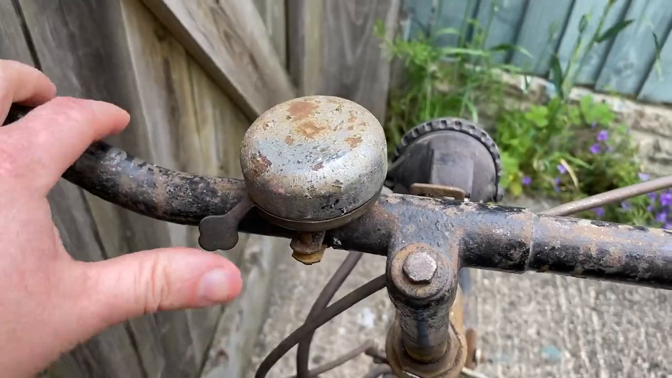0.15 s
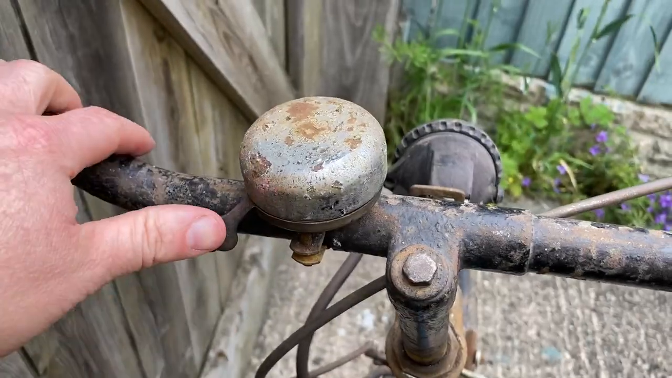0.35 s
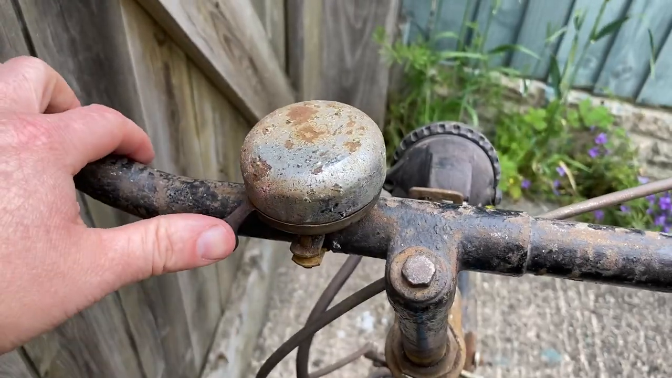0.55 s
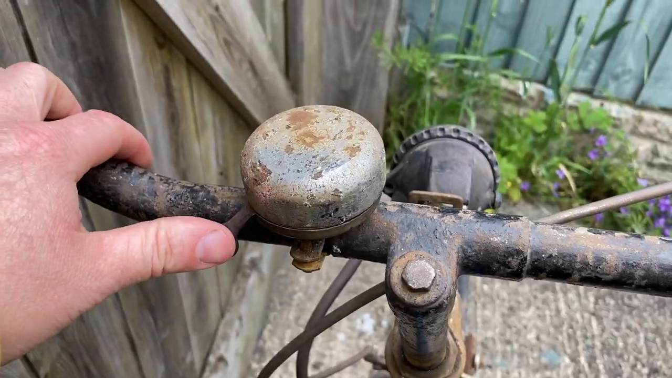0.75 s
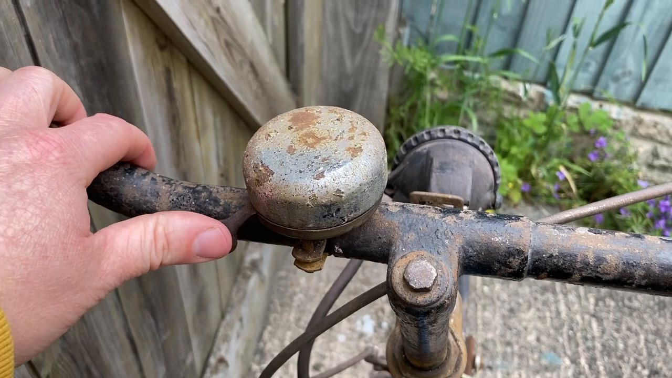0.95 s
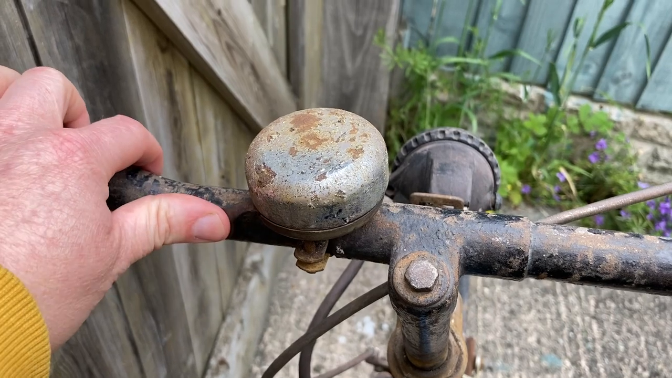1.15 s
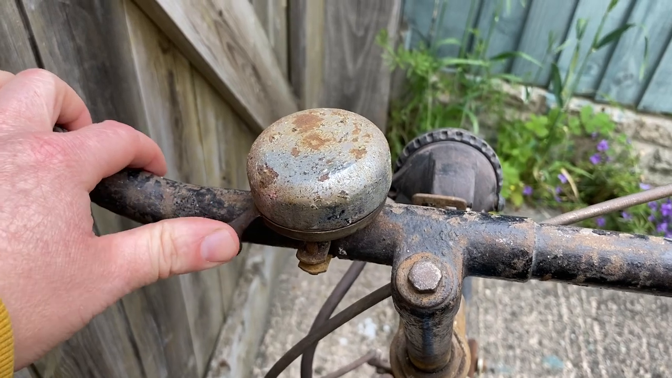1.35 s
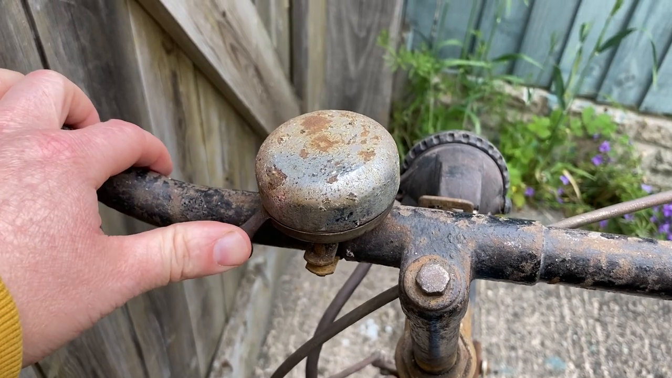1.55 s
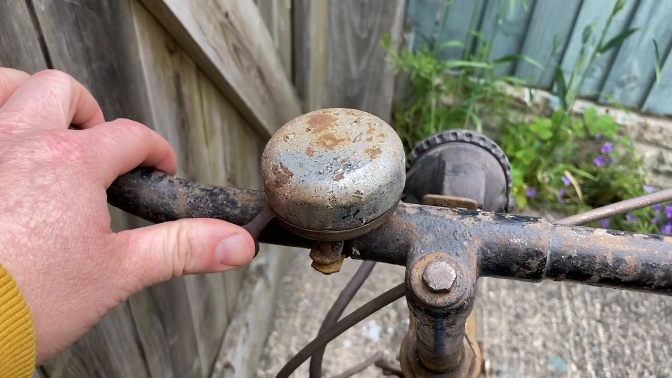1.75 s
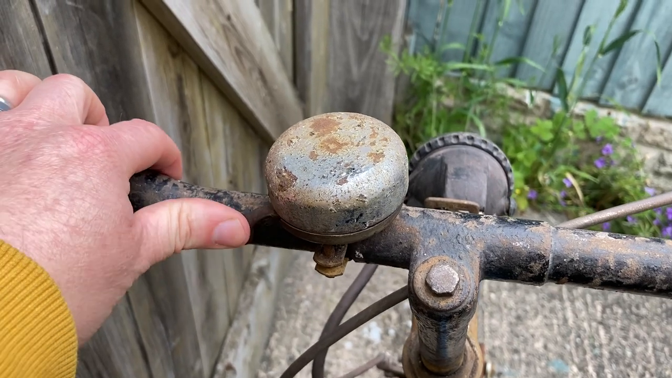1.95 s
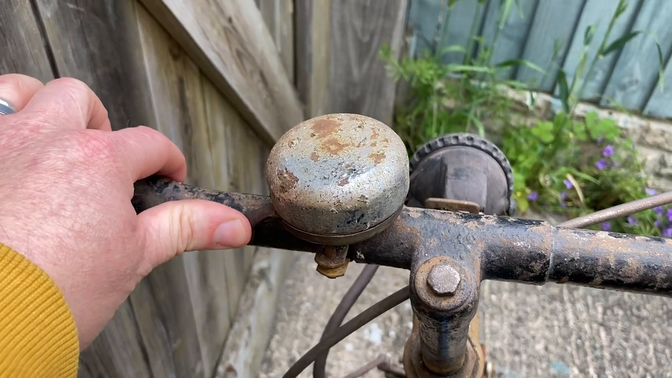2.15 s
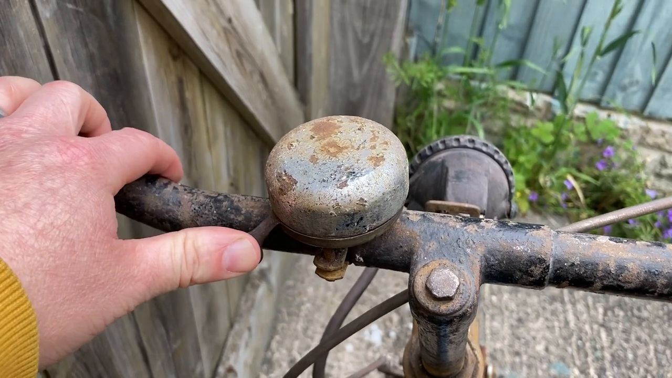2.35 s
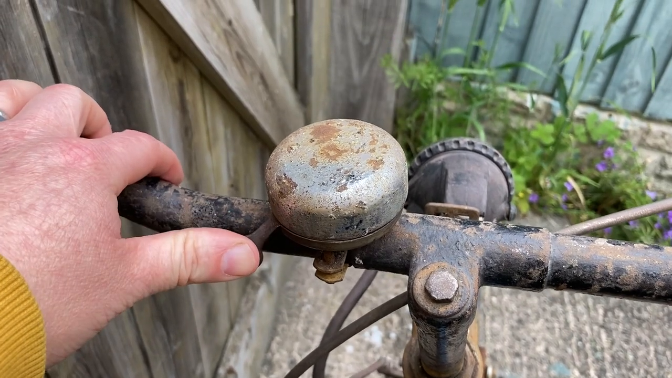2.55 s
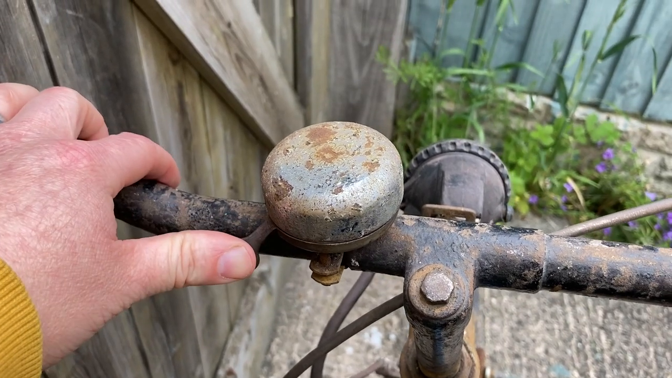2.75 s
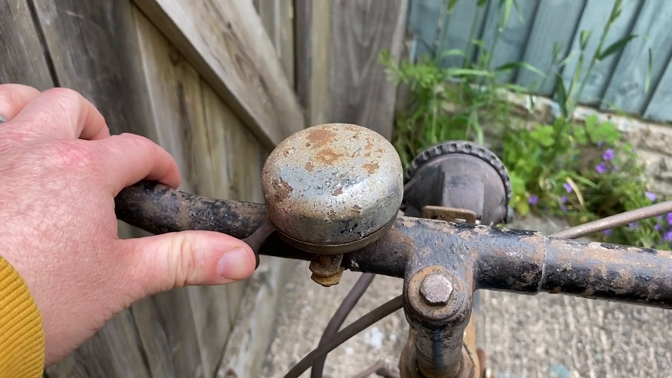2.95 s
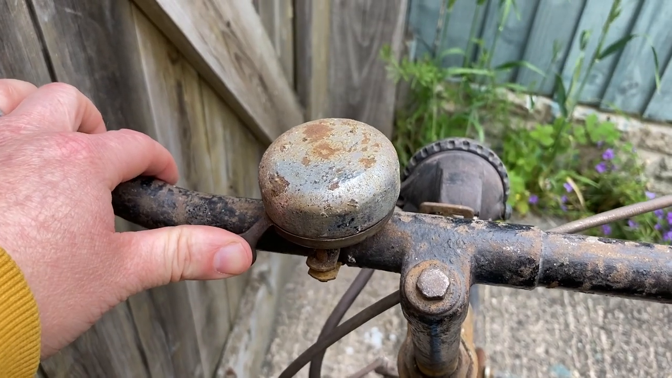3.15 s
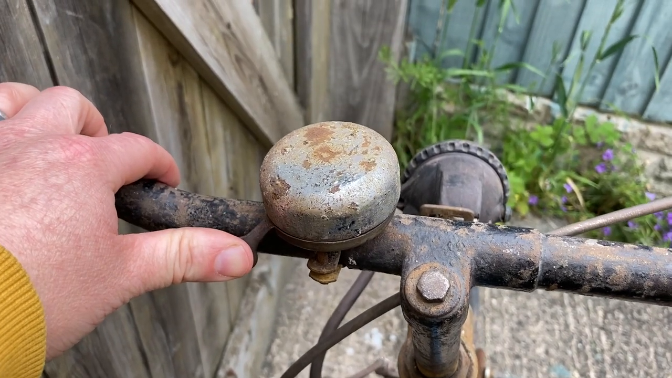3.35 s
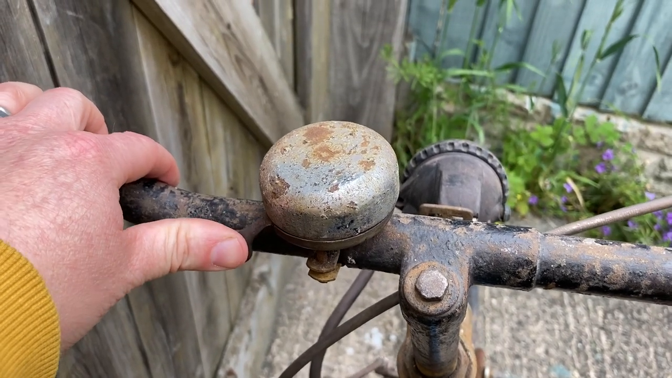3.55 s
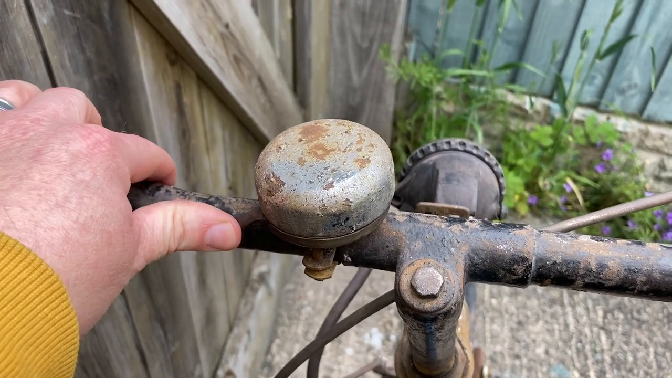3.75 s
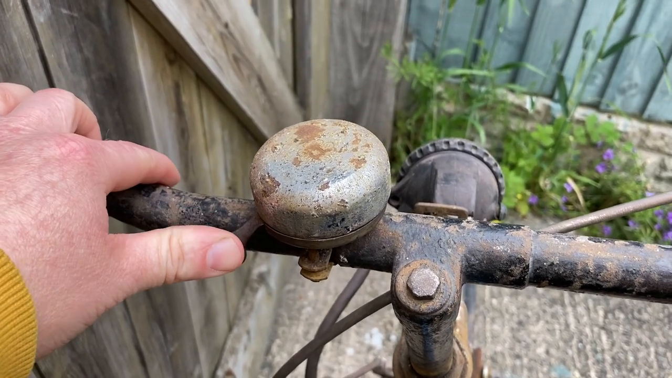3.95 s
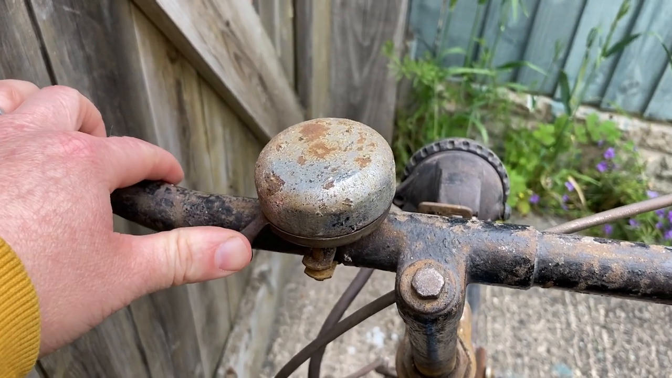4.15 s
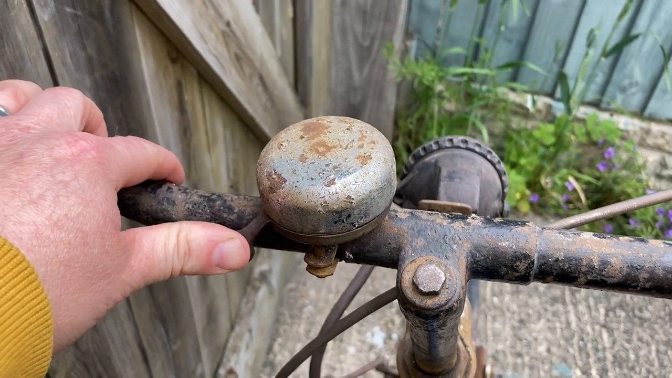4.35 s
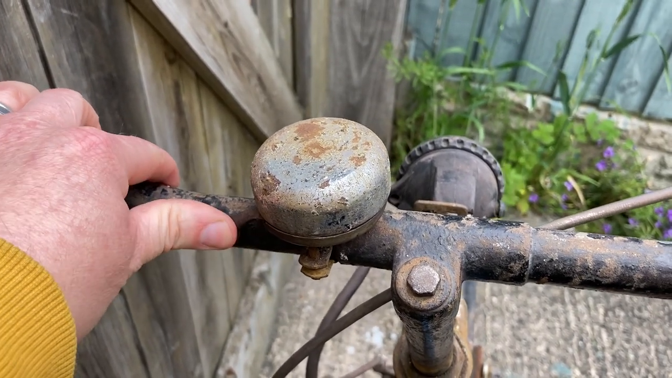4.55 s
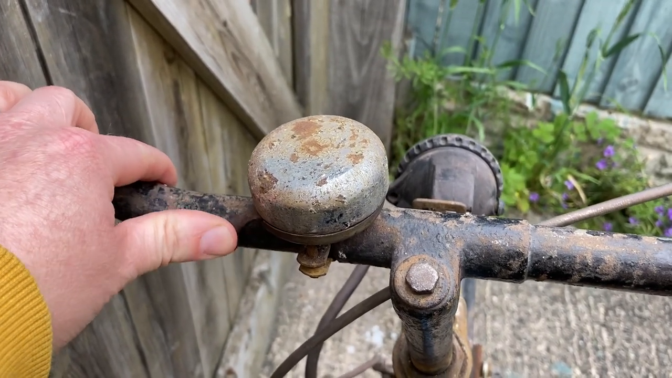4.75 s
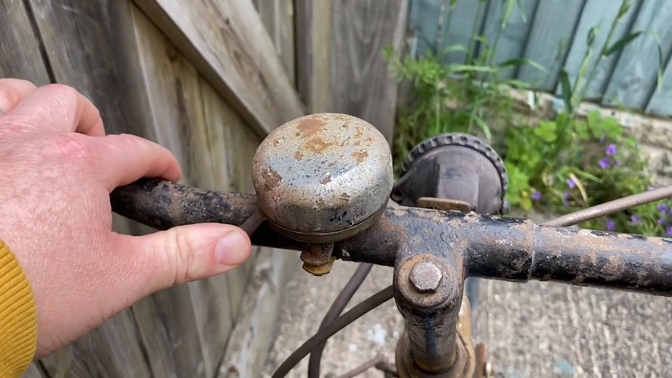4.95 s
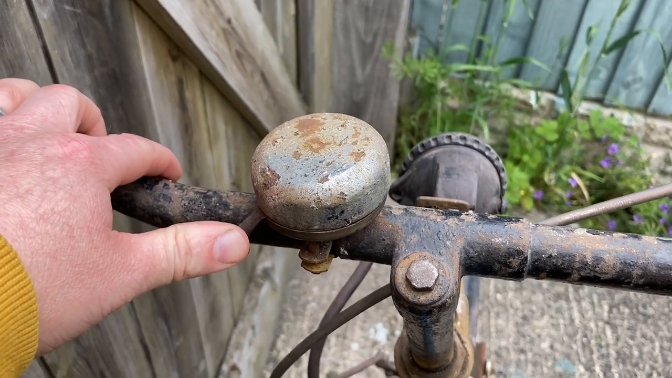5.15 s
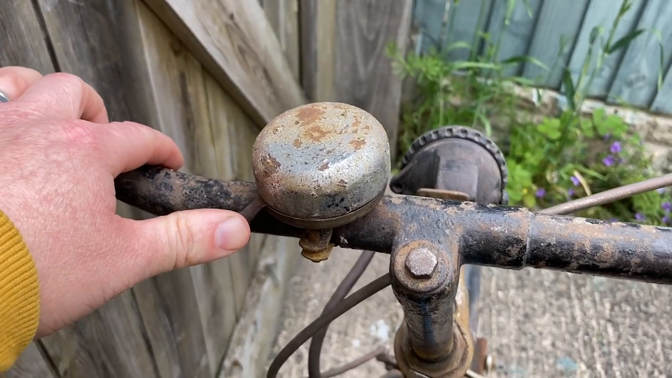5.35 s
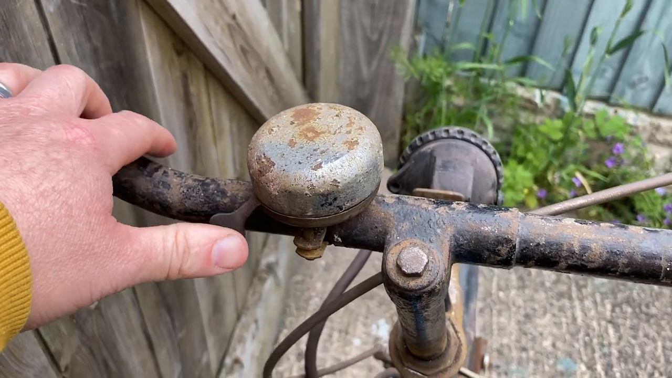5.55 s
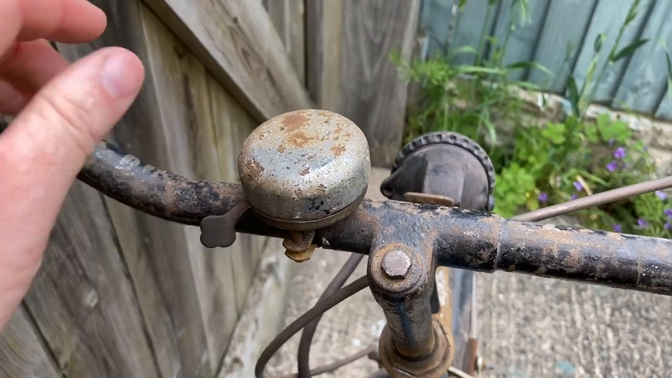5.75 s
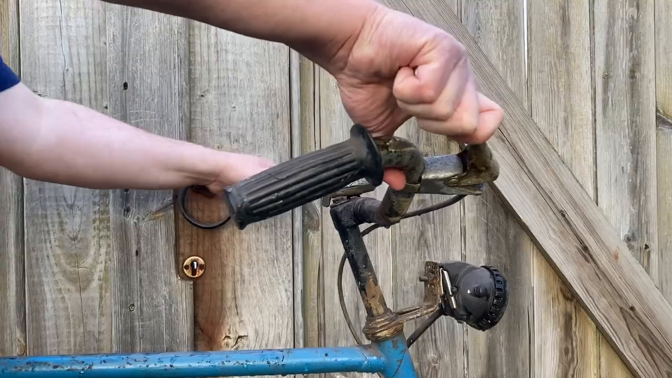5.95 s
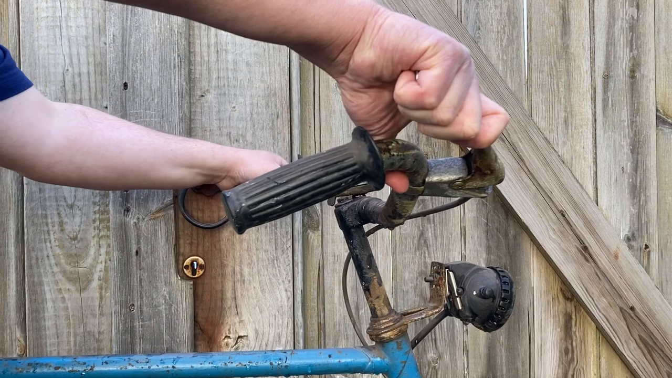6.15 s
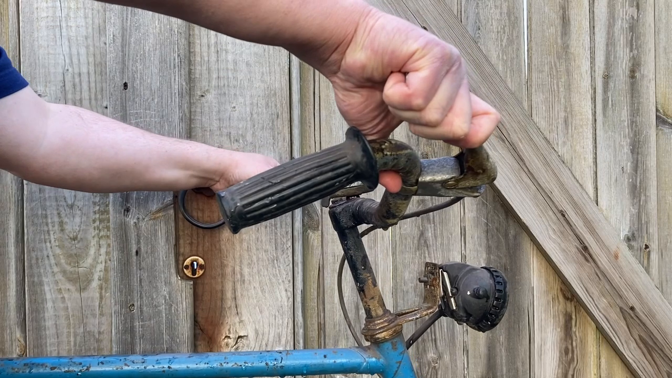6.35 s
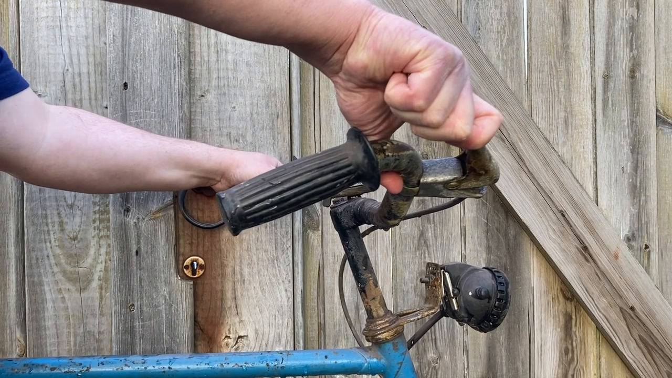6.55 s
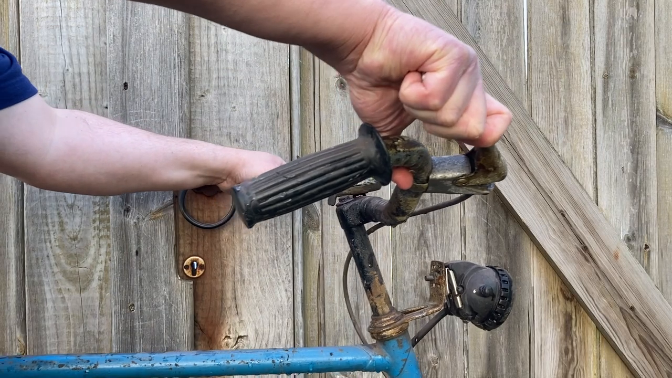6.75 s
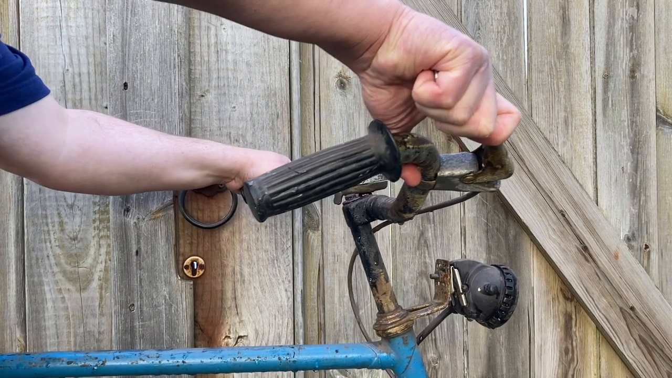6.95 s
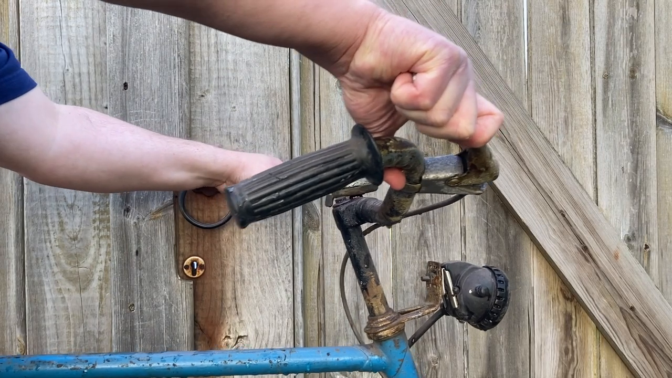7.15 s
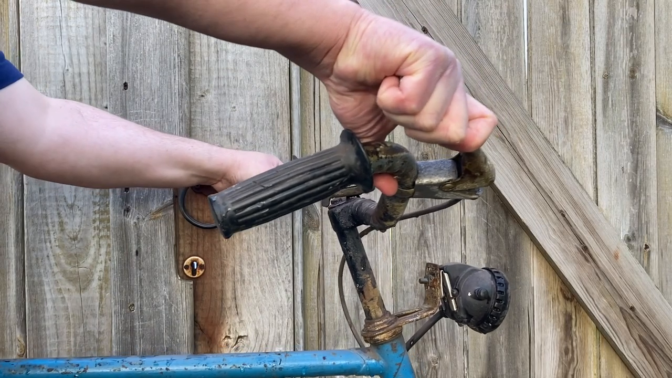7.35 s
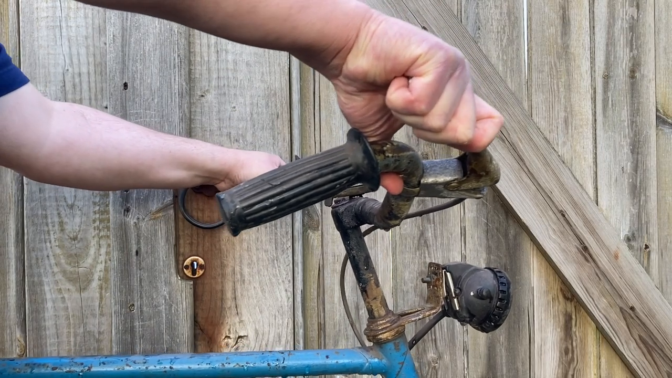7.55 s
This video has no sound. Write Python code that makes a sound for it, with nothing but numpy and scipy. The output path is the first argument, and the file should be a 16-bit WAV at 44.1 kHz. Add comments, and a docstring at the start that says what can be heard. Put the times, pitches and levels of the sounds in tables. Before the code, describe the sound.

Four grinding, jangling double rings of an old bike bell in a garden with faint bird chirps, then rougher traffic noise and handling clicks.

```python
"""An old bicycle bell, close to a two-port microphone in a garden: a thumb pushes the lever and lets it return,
gears tick and whirr, and spinning washers strike a dome built from decaying pairs of twin modes.
Noise bursts ring the gear plate and handlebar; fence and wall answer with a short diffuse echo.
Around them: coloured noise for far traffic, wind, low thuds and a rustling hand; trilled glides for far birds.
After a cut the microphone stands in a second place: louder traffic and small clicks of the handled bicycle."""
import sys
import numpy as np
from scipy import signal
from scipy.fft import rfft, irfft, next_fast_len
from scipy.io import wavfile
from scipy.ndimage import uniform_filter1d, map_coordinates

SR = 44100
rng = np.random.default_rng(int(sys.argv[2]) if len(sys.argv) > 2 else 0)


def output_pcm(signal):
    """Save a mono or channel-first signal as 16-bit PCM at the path in sys.argv[1].

    Samples are clipped to [-1, 1] before scaling.
    """
    pcm = np.clip(np.atleast_2d(signal).T, -1, 1) * 32767
    wavfile.write(sys.argv[1], SR, np.round(pcm).astype(np.int16))


N = 335160  # samples
CUT_S = 5.865  # cut to the second place
TOP_HZ = 17100  # band limit

# Levels in the tables are relative: spectra are normalised, and layers add their own offsets and random swells.
# Traffic level over time: time_s, level_db
TRAFFIC = [(0, -73.5), (.9, -72), (2.6, -69), (3.2, -72.5), (5.2, -68.5), (5.84, -71.5), (5.862, -88),
           (5.89, -58.5), (6.7, -58), (7.6, -58.5)]
# Colour of the traffic at the first and at the second place: frequency_hz, density_db_per_hz
FIRST_ROAD = [(90, -29.5), (150, -10.5), (300, -16), (450, -17), (650, -19), (900, -10), (1100, -14.5),
              (1600, -17), (2200, -28), (3000, -35.5), (4500, -45), (6500, -47), (17000, -55.5)]
SECOND_ROAD = [(88, -31), (150, -9), (420, -2.5), (532, -7), (760, 1.5), (1130, -1), (4090, -31),
               (7550, -45.5), (9200, -64), (9960, -38), (11700, -42), (13700, -52), (15400, -50),
               (17000, -58)]
# Likeness of the traffic at the two ports: frequency_hz, likeness (1 = identical)
ALIKE = [(60, 0.96), (180, 0.45), (550, -0.11), (1650, -0.023), (4970, 0.44), (15000, -0.17)]
# Low rumble of the wind: time_s, level_db, upper_part_db (relative to the rumble)
WIND = [(0, -65, -12.5), (.9, -67, -9.5), (1.8, -64.5, -7), (2.75, -66, -10), (2.95, -59, -16),
        (3.42, -67.5, -8.5), (3.55, -59, -12.5), (4.1, -57, -4), (4.3, -58.5, -12.5), (4.6, -65, -5.5),
        (4.8, -50.5, -6), (5.05, -62.5, -16.5), (5.3, -66, -8), (5.85, -69, -18), (5.95, -57.5, -12),
        (6.3, -60.5, -7), (6.7, -57, -10.5), (7.6, -57.5, -7.5)]
# Low thuds of wind gusts and of the lever through the handlebar:
# centre_s, length_s, level_db, upper_part_db (relative to the thud)
LOW_THUDS = [(0.735, 0.063, -59.5, -21), (1.396, 0.063, -53.5, 0.5), (1.95, 0.053, -57, 2.5),
             (2.353, 0.086, -54.5, -4.5), (3.104, 0.036, -47, -15.5), (3.322, 0.047, -42.5, -8),
             (3.637, 0.073, -62.5, 7), (4.187, 0.053, -49.5, -10), (4.447, 0.072, -43, -12.5),
             (4.723, 0.064, -43, -7.5), (4.817, 0.043, -48, 8.5), (4.914, 0.045, -43, -4.5),
             (4.974, 0.057, -49, -21), (5.132, 0.049, -51.5, -7.5)]
# Colours of the low and upper parts of rumble and thuds: frequency_hz, density_db_per_hz
LOW_PART = [(10, -120), (20, -31.5), (35, -10.5), (50, 2.5), (68, 3), (95, -3.5), (130, -11.5),
            (180, -50.5), (400, -120)]
UPPER_PART = [(40, -120), (90, -42.5), (135, 4), (220, -4.5), (330, -12), (600, -30.5), (900, -57.5),
              (2000, -120)]
LUMPS_DB = 2.5  # depth of the random swells of the rumble

# Handling clicks: time_s, treble_db, body_db, left_over_right_db
CLICKS = [(0.2827, -79, -61, 9), (0.4434, -77, -79, 8), (0.574, -73, -70, 2), (5.9213, -52.5, -73, 0),
          (5.9801, -54.5, -64, 3), (5.9878, -75, -65, -3), (5.9982, -61, -61, 8), (6.0452, -62.5, -78, 3),
          (6.0672, -53.5, -80, -4), (6.194, -66.5, -74, 5), (6.5841, -66, -61.5, 3), (6.726, -64, -73.5, 5),
          (6.8024, -74.5, -54, 5), (6.8577, -62, -72, 0.0), (6.9178, -74.5, -53.5, 4), (6.922, -66, -73, 5),
          (7.083, -56, -75, 2), (7.1427, -73, -72, -2), (7.2346, -52, -39.5, 5), (7.2372, -41, -62, -1),
          (7.239, -53, -49, 6), (7.244, -48, -45.5, 8.5), (7.401, -58.5, -61, 1.5),
          (7.5724, -58.5, -66.5, -1.5)]
# Colours of a click's bright and dull parts: frequency_hz, gain_db
BRIGHT_CLICK = [(3500, -88), (6000, -4), (7500, 3.5), (9300, -14), (12000, 2.5), (15800, -13), (16500, -54)]
DULL_CLICK = [(150, -80), (500, 0), (1600, -2), (4200, 4.0), (7000, -17.5), (10000, -55)]
# Skin and sleeve rubbing: start_s, length_s, level_db
RUBS = [(0.102, 0.043, -86), (0.226, 0.13, -87), (5.936, .09, -76.5), (6.044, 0.035, -83),
        (6.694, .05, -81.5), (7.085, 0.033, -83.5), (7.24, 0.023, -74)]
# Colour of the rubbing: frequency_hz, density_db_per_hz
RUB_COLOUR = [(2650, -26), (4500, -13), (8020, 6.5), (8970, -15), (9740, 1), (11400, 7.5), (13700, -12.5),
              (15000, 7.5), (17000, -39)]
RUB_EDGE_DB_PER_S = 304  # rise and fall of each rub
RUB_BED_DB = (-94.5, -88)  # faint rubbing between them, at the first and second place

# Far bird chirps: start_s, end_s, from_hz, to_hz (the glide crosses the 30 to 80 % part of this range), level_db
BIRDS = [(0.17, 0.339, 4310, 3500, -77.5), (0.726, 0.874, 4620, 3400, -86),
         (2.414, 2.59, 4900, 3600, -80.5), (3.015, 3.181, 4440, 3370, -82), (3.205, 3.443, 4900, 3280, -80),
         (3.414, 3.528, 4453, 2826, -74), (5.066, 5.227, 4620, 3250, -79.5),
         (5.246, 5.5, 5060, 2773, -77.5), (5.477, 5.625, 4690, 3250, -77),
         (5.627, 5.833, 5190, 3040, -75.5), (6.407, 6.56, 4490, 3210, -67), (6.729, 6.857, 4160, 3460, -78),
         (7.269, 7.303, 3530, 3120, -71), (7.45, 7.603, 4260, 3200, -68.5)]
# Echoes of fence and wall: frequency_hz, gain_db
FENCE_COLOUR = [(1500, -6.0), (3000, -9.5), (6000, -9), (11000, 0), (13500, -16)]

# Lever travel: first_tooth_s, drone_start_s, stop_s, drone_db, knock_db (at the stop)
STROKES = [(.931, .974, 1.111, -59, -58.5), (1.258, 1.287, 1.403, -61, -51), (1.823, 1.907, 2, -52.5, -48),
           (2.17, 2.209, 2.329, -56.5, -45), (3.515, 3.54, 3.697, -56, -62.5),
           (3.827, 3.859, 4.005, -56, -47.5), (4.362, 4.408, 4.533, -55.5, -62),
           (4.72, 4.743, 4.864, -57.5, -43)]
# Individually placed gear teeth: time_s, level_db
TEETH = [(1.046, -40), (1.09, -43), (1.108, -50), (1.4, -46), (1.407, -41), (1.847, -50), (1.885, -41),
         (1.922, -51.5), (1.981, -40.5), (2.265, -40.5), (2.33, -36), (3.629, -36), (3.662, -39),
         (3.827, -47.5), (3.89, -41.5), (3.971, -40), (3.996, -36), (4.383, -48.5), (4.41, -55),
         (4.415, -47.5), (4.473, -33.5), (4.785, -45.5), (4.804, -39), (4.832, -38.5), (4.858, -30.5)]
TOOTH_S, TOOTH_SCATTER = .011, .25  # spacing of a stroke's soft teeth, and scatter as a share of a gap
FIRST_DB, FULL_DB, TOOTH_SPREAD_DB = -60, -43, 2.5  # first tooth, teeth at full speed, random spread
LEAD_S, LEAD_DB = 0.0083, -45.5  # a tooth ticks just ahead of each later strike
# Dry edge of a tooth: frequency_hz, density_db_per_hz
TICK = [(700, -30), (1500, -12.5), (4000, -4), (7000, -5.5), (11000, -0.5), (16000, -8)]
# Resonances of the gear plate: centre_hz, width_hz, level_db
PLATE = [(2500, 500, -12.5), (5170, 170, -12.5), (8000, 690, -7.5), (8695, 170, -15.5), (10590, 150, 0),
         (11240, 450, 1.5), (12350, 360, -1.5), (12324, 570, -12.5), (14500, 150, -6.5),
         (15100, 270, -11.5), (15600, 190, -8)]
# Resonances of the handlebar: centre_hz, width_hz, level_db
BAR = [(163, 22, -8.5), (470, 78, -1.5), (610, 160, -7.5), (914, 160, -7.5), (978, 130, -6.5),
       (1130, 310, -6), (2158, 740, -17.5), (3260, 370, -12.5)]
# Resonances of the knock at the stop: centre_hz, width_hz, level_db
KNOCK = [(1096, 56, 0.0), (2160, 230, -14.0), (457, 48, -13.5)]
# Phase between the ports for sound from the mechanism: frequency_hz, left_lead_rad
PORTS = [(0, 0), (340, 0.6), (860, -6.7), (1720, -2.9), (3100, -3.1), (4220, 0.6), (4570, 3.2), (5000, 3.5),
         (6290, 0.0), (7410, -0.1), (8180, -2.0), (14600, -10.7), (15800, -12.5), (16700, -12.4)]

# Dome, five pairs of twin modes split by the uneven rim:
# frequency_hz, t60_s, start_rad, left_over_right_db, left_lead_rad
DOME = [(1607.5, .9, 0, 6.8, 1.0), (1653, .9, .4, .4, -2.3), (3896, .36, 0, -.2, -.5),
        (3966, .36, 2.4, 10.8, -.2), (6683, .19, 0, .4, .3), (6783, .19, 1.7, 1.1, .1),
        (9959, .11, 0, .1, 1.9), (10096, .11, -2.6, .1, 1.8), (13787, .068, 0, .2, 2.9),
        (13898, .068, -.7, .2, 2.8)]
# Washer strikes: time_s, strength_db, brightness_db (per pair), upper_twin_lean_db,
# swap_db (raises the second pair, lowers the third)
STRIKES = [(0.9941, -25.5, 1.74, -5.5, -1), (1.0635, -27, 2.5, -7, 3), (1.1015, -36.0, -0.7, -13.5, 4.5),
           (1.2984, -28.5, 4, -3.5, 0.5), (1.3319, -31, 4, -9.5, 1.5), (1.3582, -26.5, 0.4, -3.5, -0.5),
           (1.3859, -29.5, 0, 1, -1), (1.8645, -42, -3, -1.5, -3), (1.9282, -22.5, 0.4, -0.5, -1.5),
           (1.9574, -24.0, 0.6, -3.5, 5), (1.9909, -28.0, -0.5, -0.0, 3.0),
           (2.2192, -28.5, -0.05, 4.0, -0.5), (2.2814, -23.5, 0, -0.5, 0), (2.3093, -25.0, -2.5, -4, 3.5),
           (2.318, -31.5, -2, 1.5, 3), (3.534, -40.5, -1.65, -4, -5.0), (3.574, -26.0, 0.5, 1, -1.5),
           (3.6076, -24.5, 0.5, -1.0, 0.5), (3.638, -24.5, 0.4, -1, -5), (3.6733, -26.5, -1.7, 6, -3),
           (3.8702, -26.5, 0.95, -1.5, -2.5), (3.9084, -30.0, 0.7, 1.5, -0.5), (3.9462, -30.0, -1, 3.0, 2),
           (3.978, -29, -0.5, 7, -1), (4.4285, -27, 0.56, -4, -1.5), (4.4569, -26.5, 1.1, -4.5, 0),
           (4.4849, -28.5, 2, 8.5, -1), (4.5185, -29.5, -1.82, 12, -1), (4.7593, -33.0, 3.5, -5, 0.5),
           (4.819, -29, 1.2, 8, -0.5), (4.844, -30.0, -1.66, 3.5, -2.5)]
# Five pairs over the strength, one column a pair in db; rows: pushing, returning
PAIR_DB = [(-13.5, -8, -10.5, 7.6, 9.5), (-10, -6.5, -2, 8.63, 13.5)]
# Upper twin over lower twin, one column a pair in db; rows: pushing, returning
TWIN_DB = [(3.5, 1.1, 1.5, -6, -10), (7.5, 0.089, 6, -6.5, -9.5)]
# How far each of the five pairs follows a strike's lean: one factor a pair
LEAN = (1, .6, .3, -.5, 0)
# Contact noise of a strike: frequency_hz, density_db_per_hz
CRACK = [(150, -29), (1000, -34), (3000, -32), (4200, -16.5), (6000, -25), (8200, -12), (10300, -6),
         (12000, -9.5), (14000, -5.5), (16000, -15), (17000, -42.5)]
CLANG_DB, CLANG_T60_S = -5.5, .015  # brief extra start of the two highest pairs


def amp(db):
    """Gain of a level in dB."""
    return 10 ** (np.asarray(db) / 20)


def unit(x):
    """x at rms 1."""
    return x / np.sqrt(np.mean(x ** 2) + 1e-20)


def along(points, hz):
    """Value at hz between (Hz, value) points on a log axis."""
    f, v = np.transpose(points)
    return np.interp(np.log(hz + 1), np.log(f + 1), v)


def colour(points):
    """Gain as a function of frequency from (Hz, dB) points."""
    return lambda hz: amp(along(points, hz))


def curves(rows):
    """One value per sample for each column after the time."""
    s, *cols = np.transpose(rows)
    return [np.interp(np.arange(N) / SR, s, c) for c in cols]


def wobble(rate):
    """A smooth random curve, rate knots a second."""
    knots = rng.standard_normal(int(N * rate / SR) + 4)
    return map_coordinates(knots, [np.arange(N) * rate / SR])


def filtered(x, response):
    """x times a complex response of frequency."""
    m = next_fast_len(N + SR)
    return irfft(rfft(x, m) * response(np.fft.rfftfreq(m, 1 / SR)), m)[..., :N]


def noise(spectrum, alike):
    """Coloured stereo noise of rms 1; the mix of mid and side sets its left-right likeness."""
    def mid_side(hz):
        turn = np.arccos(np.clip(along(alike, hz), -1, 1)) / 2
        return amp(along(spectrum, hz)) * [np.cos(turn), np.sin(turn)]

    mid, side = filtered(rng.standard_normal((2, N)), mid_side)
    return unit(np.array([mid + side, mid - side]))


def bursts(times, db, t60):
    """An envelope that jumps at each time and dies away by 60 dB in t60 seconds."""
    kicks = np.bincount(np.round(np.asarray(times) * SR).astype(int), amp(db), N)[:N]
    return signal.lfilter([1], [1, -amp(-60 / (t60 * SR))], kicks)


def modes(table):
    """Response of a set of resonances with alternating signs."""
    def response(f):
        return sum((-1) ** k * amp(db) * 1j * f * w / (c * c - f * f + 1j * f * w)
                   for k, (c, w, db) in enumerate(table))
    return response


def nearby(envelope, response, apart):
    """Noise from the bell's place: shared by both ports with a phase shift, plus an unrelated share."""
    f, lead = np.transpose(PORTS)
    power = np.mean(abs(response(np.linspace(1, SR / 2, 4000))) ** 2)
    norm = np.sqrt(power * (1 + apart ** 2))
    shared = filtered(envelope * rng.standard_normal(N),
                      lambda hz: np.exp(.5j * np.outer([1, -1], np.interp(hz, f, lead))))
    unrelated = apart * envelope * rng.standard_normal((2, N))
    return filtered(shared + unrelated, response) / norm


def traffic(second_place):
    """Far traffic as coloured noise; the second place has its own colour and leans left."""
    second = noise(SECOND_ROAD, ALIKE) * amp([[1.5], [-1.5]])
    road = np.where(second_place, second, noise(FIRST_ROAD, ALIKE))
    road_db, = curves(TRAFFIC)
    return amp(road_db + 1.1 * wobble(8)) * road


def rumble_and_thuds(second_place):
    """Lumpy low noise of wind and thuds; at the first place the ports are less alike the stronger it is."""
    low_db, upper_db = curves(WIND)
    swell_db = LUMPS_DB * wobble(9)
    low_gain = amp(low_db + swell_db)
    upper_gain = amp(low_db + upper_db + swell_db / 2)
    t = np.arange(N) / SR
    for centre, length, db, up_db in LOW_THUDS:
        thud = amp(db) * np.exp(-(2 * (t - centre) / length) ** 2)
        low_gain += thud
        upper_gain += thud * amp(up_db)
    # 1 = nearly identical ports, 0 = loosely related ports
    calm = np.where(second_place, 1, np.clip((-46 - 20 * np.log10(low_gain)) / 10, 0, 1))

    def layer(spectrum):
        return calm * noise(spectrum, [(60, .97)]) + np.sqrt(1 - calm ** 2) * noise(spectrum, [(60, .45)])

    return amp(1.0 * wobble(25)) * (low_gain * layer(LOW_PART) + upper_gain * layer(UPPER_PART))


def low_and_far():
    """Far traffic, wind rumble and low thuds as they reach the microphone in its two places."""
    second_place = np.arange(N) > CUT_S * SR
    return traffic(second_place) + rumble_and_thuds(second_place)


def handling():
    """Dry clicks, noise bursts with a bright and a duller part, over the hiss of rubbing skin and cloth."""
    s, treble_db, body_db, pan_db = np.transpose(CLICKS)

    def click(db, t60, points):
        envelope = np.array([bursts(s, db + pan_db / 2, t60), bursts(s, db - pan_db / 2, t60)])
        return filtered(envelope * rng.standard_normal((2, N)), colour(points))

    clicks = click(treble_db, 0.024, BRIGHT_CLICK) + click(body_db, 0.029, DULL_CLICK)
    t = np.arange(N) / SR
    # the faint bed pauses from the first lever stroke until the second place
    press = amp(np.where(t < CUT_S, *RUB_BED_DB)) * ((t < STROKES[0][0]) | (t > CUT_S))
    for start, length, db in RUBS:
        outside_s = np.maximum(0, np.maximum(start - t, t - start - length))
        press += amp(db - RUB_EDGE_DB_PER_S * outside_s)
    flutter_db = 1.9 * wobble(72) + np.array([[1.2], [-1.2]])  # leans left
    return clicks + press * amp(flutter_db) * noise(RUB_COLOUR, [(8000, 0.087)])


def birds():
    """Each chirp falls in pitch under a fast, wide trill and is heard almost only through its echoes."""
    time = np.arange(N) / SR
    trill = np.sin(2 * np.pi * np.cumsum(38 + 12 * wobble(20)) / SR)  # around 38 Hz
    stray_hz = 300 * wobble(60)
    song = np.zeros(N)
    for start, end, from_hz, to_hz, db in BIRDS:
        span = slice(int(start * SR), int(end * SR))
        u = np.clip((time[span] - start) / (end - start), 0, 1)
        glide_hz = from_hz + (to_hz - from_hz) * (.3 + .5 * u)
        hz = glide_hz + (620 * trill + stray_hz)[span] * np.minimum(10 * u + .4, 1)
        song[span] += amp(db + 5.0) * np.sin(np.pi * u) ** 0.394 * np.sin(2 * np.pi * np.cumsum(hz) / SR)
    song *= amp(3 * wobble(45) - 1)
    t = np.arange(SR // 2) / SR
    echoes = rng.standard_normal((2, len(t))) * amp(-60 * t / .35)
    echoes /= np.linalg.norm(echoes[0])
    heard = .2 * song + signal.fftconvolve(song[None], echoes, axes=1)[:, :N]
    # silent from just before the cut to the second place until 0.4 s after it
    return heard * ((time < CUT_S - .01) | (time > CUT_S + .4))


def strikes():
    """Time, direction, pair levels and twin balance of every strike; direction turns after each pause."""
    s, db, bright_db, lean_db, swap_db = np.transpose(STRIKES)
    returning = np.cumsum(np.diff(s, prepend=s[0]) > .15) % 2  # 0 pushing, 1 returning
    pair_db = db[:, None] + np.array(PAIR_DB)[returning]
    pair_db = pair_db + np.outer(bright_db, np.arange(-2, 3)) + np.outer(swap_db, [0, 1, -1, 0, 0])
    twin_db = np.array(TWIN_DB)[returning] + np.outer(lean_db, LEAN)
    return s, returning, pair_db, twin_db


def teeth():
    """Soft teeth that swell up to a stroke's first strike, one ahead of each later strike, and the listed ones."""
    hit_s, returning, _, _ = strikes()
    rows = list(TEETH)
    for first, start, *_ in STROKES:
        full = hit_s[hit_s > start][0]
        gap, size = rng.standard_normal((2, 12))
        count = np.arange(len(gap))
        s = first + TOOTH_S * (count + TOOTH_SCATTER * gap * np.sign(count))  # the first is exact
        swell = (s - first) / (full - first)
        db = FIRST_DB + (FULL_DB - FIRST_DB) * swell + TOOTH_SPREAD_DB * size
        rows += list(zip(s[s < full - .003], db))
    later = hit_s[1:][np.diff(returning) == 0]
    gap, size = rng.standard_normal((len(later), 2)).T
    rows += list(zip(later - LEAD_S * (1 + TOOTH_SCATTER * gap), LEAD_DB + TOOTH_SPREAD_DB * size))
    return np.transpose(rows)


def gears():
    """Teeth and strikes shake the resonant gear plate; teeth before the first drone also wake the dome's hum."""
    s, db = teeth()
    hit_s, _, pair_db, _ = strikes()
    shake = bursts(s, db - 1.0, 0.01) + bursts(s, db - 4.5, 0.032)
    shake += bursts(hit_s, pair_db[:, 3] - 28.5, 0.077) * amp(9.3 * wobble(500))  # rough whirr
    tick = nearby(bursts(s, db - 4, 0.0031), colour(TICK), apart=.3)
    pushes = np.bincount((s * SR).astype(int), amp(np.minimum(db, -54) - 11.0), N)
    pushes = pushes * (np.arange(N) < STROKES[0][1] * SR)
    t = np.arange(SR // 8) / SR
    hum = sum(np.cos(2 * np.pi * hz * t + [[lead], [0]]) * amp(-60 * t / t60)
              for hz, t60, _, _, lead in DOME[:2])
    hummed = signal.fftconvolve(pushes[None], hum, axes=1)[:, :N]
    return nearby(shake, modes(PLATE), apart=0.39) + tick + hummed


def lever():
    """The handlebar's resonances drone roughly while the lever travels and knock when it reaches the stop."""
    t = np.arange(N) / SR
    _, start, stop, drone_db, knock_db = np.transpose(STROKES)
    travel = sum(amp(db) * ((t > a) & (t < b)) for a, b, db in zip(start, stop, drone_db))
    drone = uniform_filter1d(travel, size=500) * amp(5.2 * wobble(90)) + bursts(stop, drone_db, 0.17)
    knock = nearby(bursts(stop - .004, knock_db + 3.0, 0.039), modes(KNOCK), apart=0.44)
    return nearby(drone, modes(BAR), apart=1.0) * amp([[2.5], [-2.5]]) + knock


def bell():
    """Each washer stops the old ringing and starts the dome anew; it hits another spot when the lever returns."""
    hz, t60, start, pan_db, lead = np.array(DOME).T[:, :, None]
    s, returning, pair_db, twin_db = strikes()
    right = np.sqrt(2 / (1 + amp(2 * pan_db)))
    left = right * amp(pan_db)
    at = np.round(s * SR).astype(int)
    out = np.zeros((2, N + 2 * SR))
    for k in range(len(at)):
        held = at[k + 1] - at[k] if k + 1 < len(at) else SR
        t = np.arange(min(held, SR * 3 // 2) + 40) / SR
        upper = amp(twin_db[k])
        # twins flip sign on the far side of a node
        split = np.column_stack([np.ones(len(upper)), upper * (-1) ** returning[k]])
        size = (amp(pair_db[k])[:, None] * split / np.hypot(1, upper)[:, None]).reshape(-1, 1)
        gate = np.clip((t[-1] - t) * SR / 40, 0, 1) * (1 - np.exp(-t / 0.0002))
        fade = amp(-60 * t / t60)
        fade = fade + amp(-36.0 - 60 * t / 0.4) * (abs(hz - 10000) < 500)  # fourth pair's faint, slower after-ring
        fade += amp(CLANG_DB - 60 * t / CLANG_T60_S) * (hz > DOME[5][0])
        turn = 2 * np.pi * hz * t + start
        out[0, at[k]:][:len(t)] += gate * (size * left * fade * np.cos(turn + lead)).sum(0)
        out[1, at[k]:][:len(t)] += gate * (size * right * fade * np.cos(turn)).sum(0)
    contact = bursts(s, pair_db[:, 3] - 4.5, 0.019) + bursts(s, pair_db[:, 4] - 7.5, 0.0043)
    return out[:, :N] + nearby(contact, colour(CRACK), apart=0.34)


def fence(x):
    """A short diffuse answer from fence and wall as decaying noise, dull at the very top."""
    t = np.arange(SR // 3) / SR
    tail = rng.standard_normal((2, len(t))) * amp(-60 * t / 0.12) * (t > .003)
    wet = signal.fftconvolve(x, tail / np.linalg.norm(tail[0]), axes=1)[:, :N]
    return filtered(wet, colour(FENCE_COLOUR))


def scene():
    """Bell and mechanism close by with their echo, over the garden."""
    near = gears() + lever() + bell()
    return low_and_far() + handling() + birds() + near + amp(-26) * fence(near)


def record(dry):
    """Nothing is kept above the band limit."""
    return filtered(dry, lambda hz: hz < TOP_HZ)


dry = scene()
out = record(dry)
output_pcm(out)
```